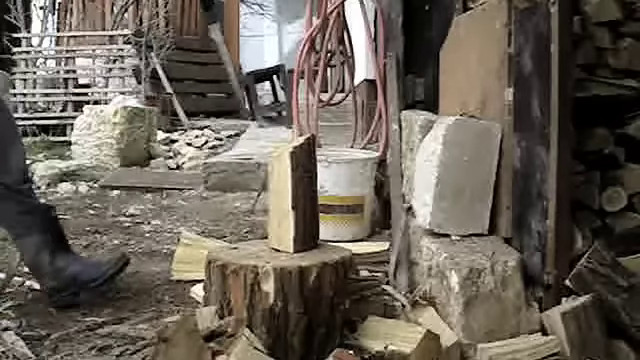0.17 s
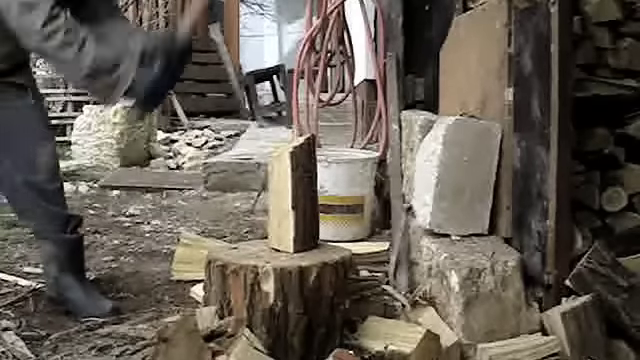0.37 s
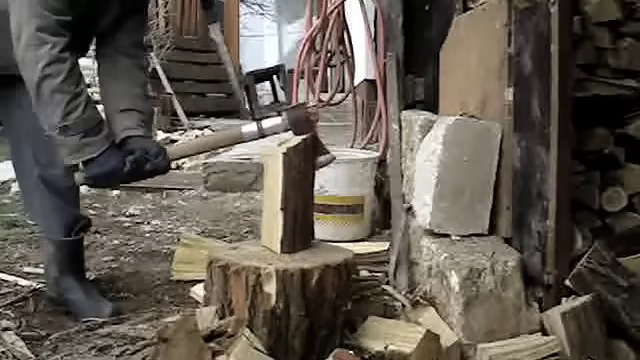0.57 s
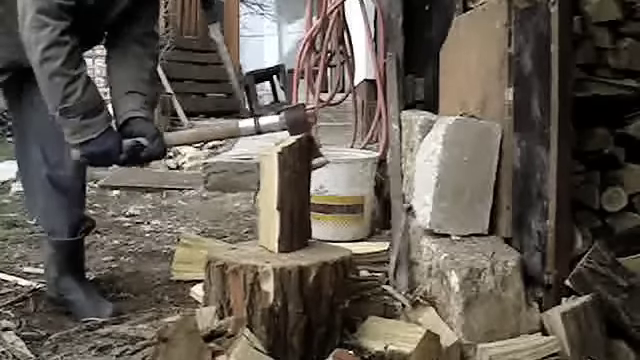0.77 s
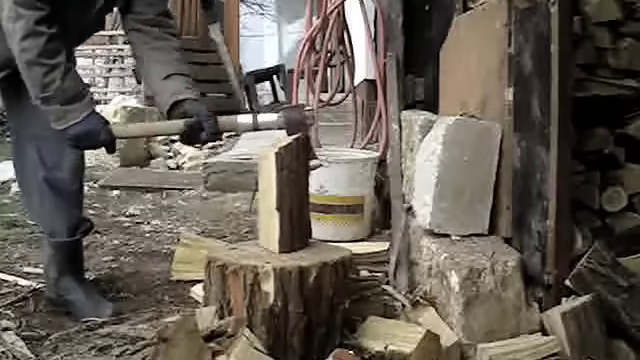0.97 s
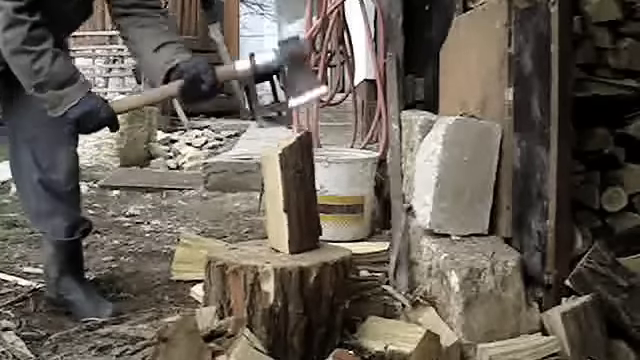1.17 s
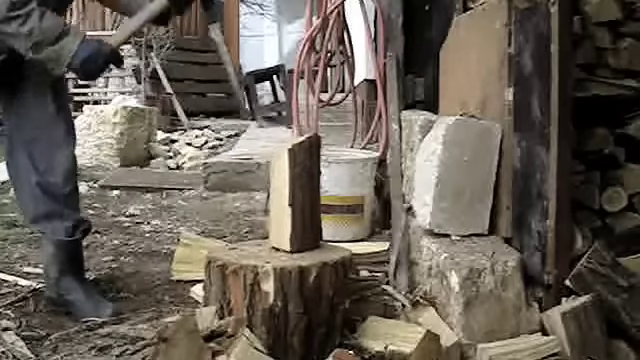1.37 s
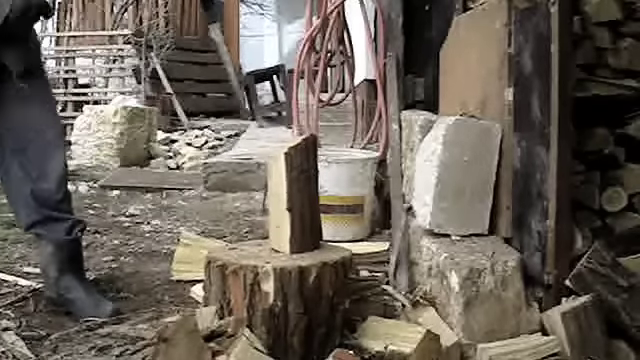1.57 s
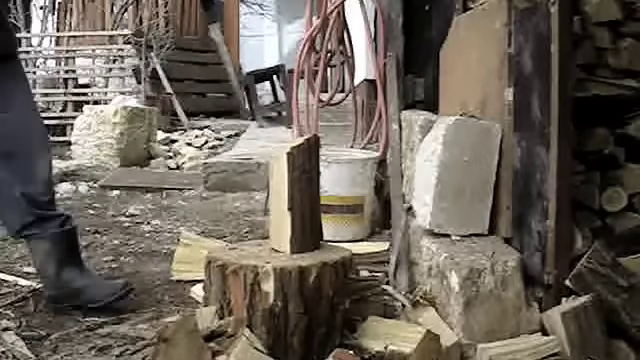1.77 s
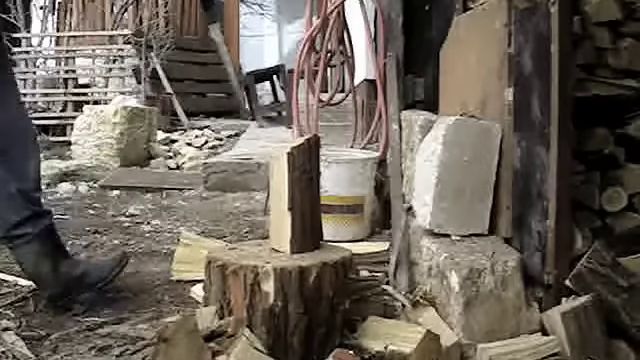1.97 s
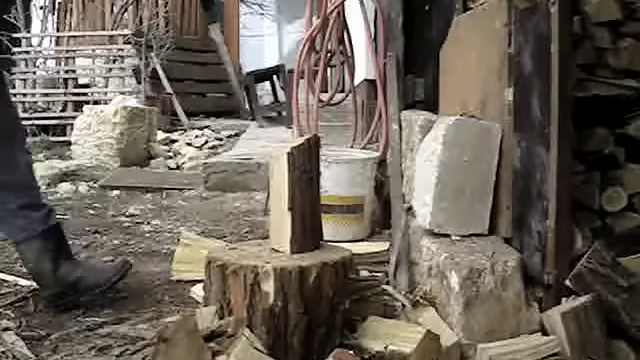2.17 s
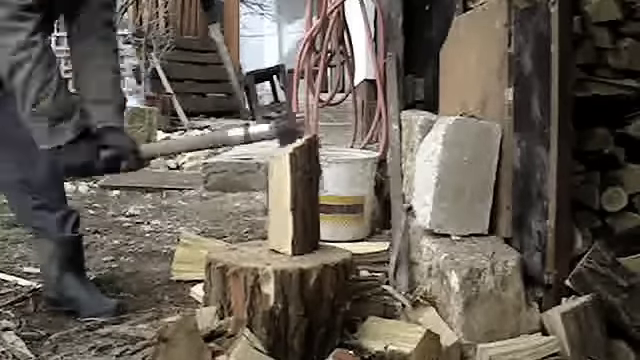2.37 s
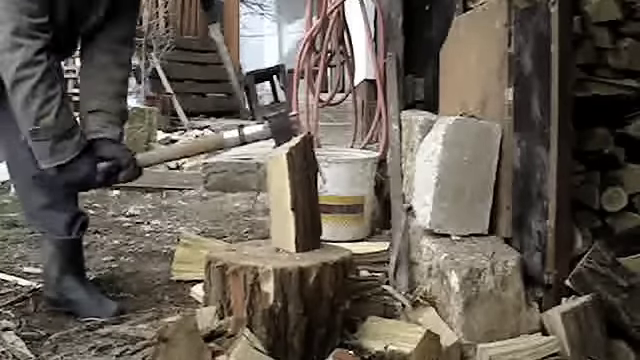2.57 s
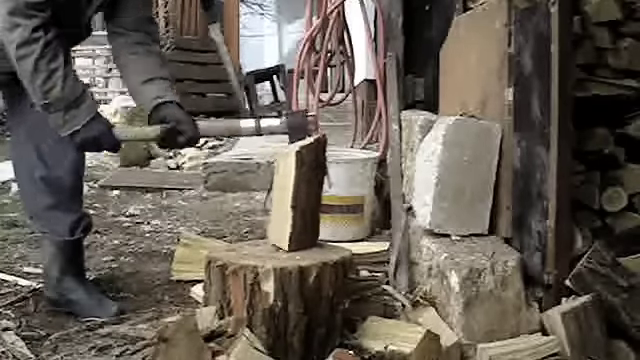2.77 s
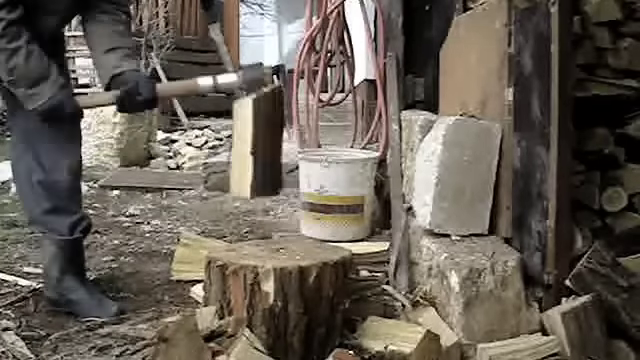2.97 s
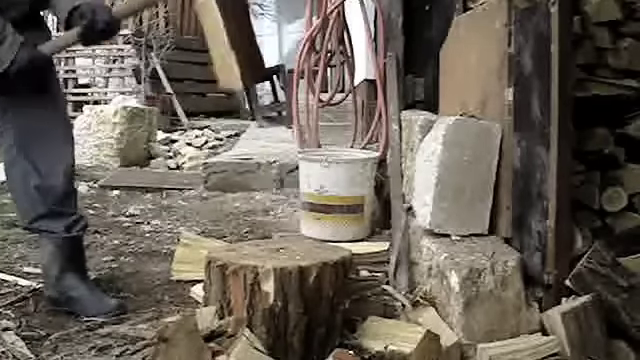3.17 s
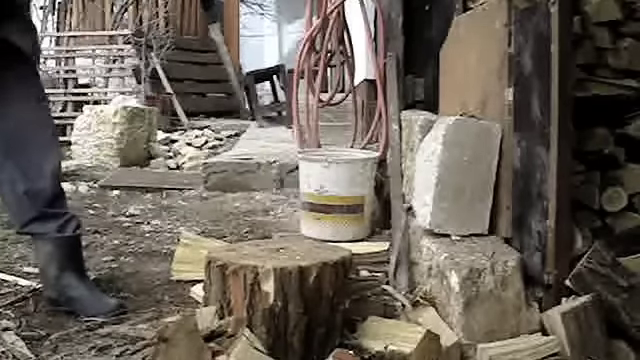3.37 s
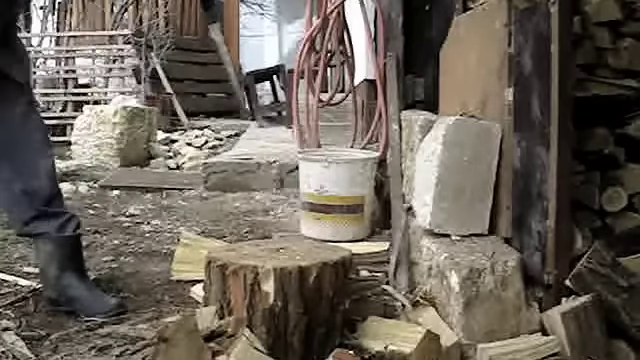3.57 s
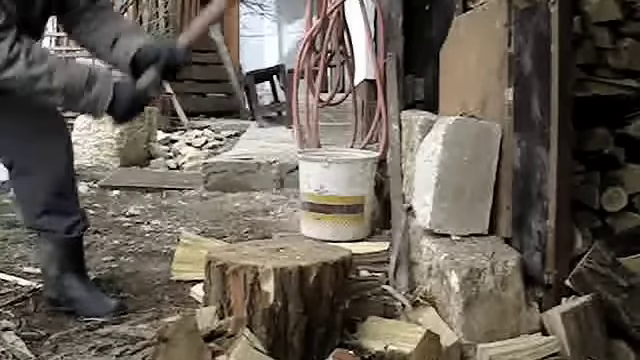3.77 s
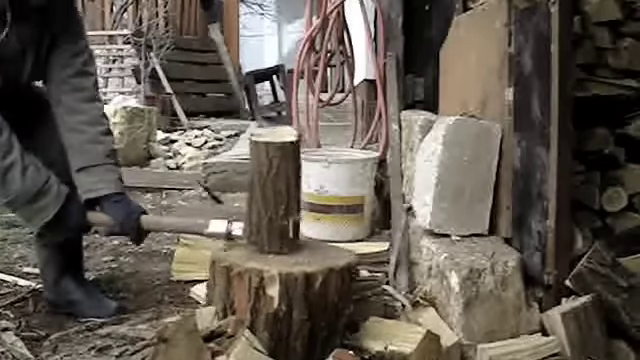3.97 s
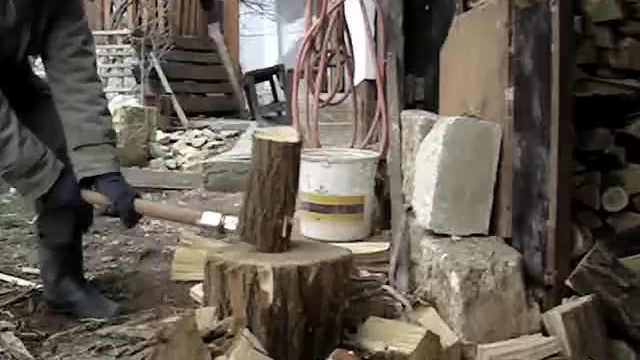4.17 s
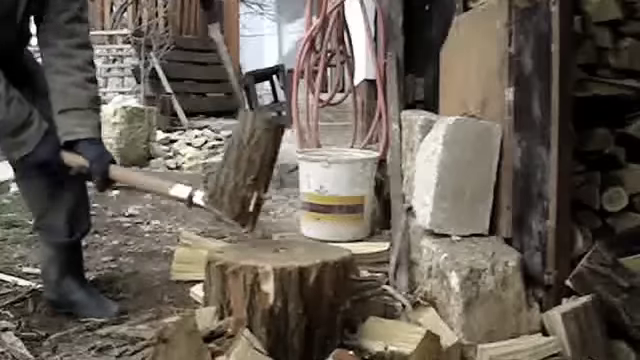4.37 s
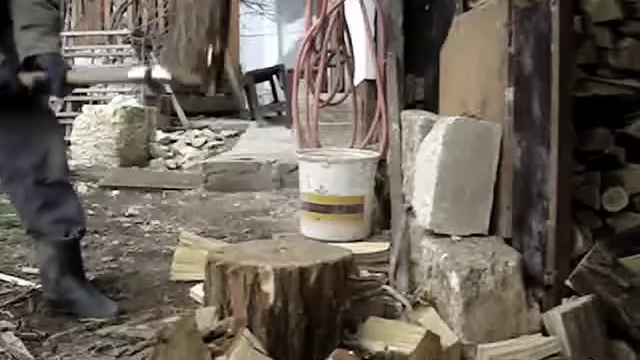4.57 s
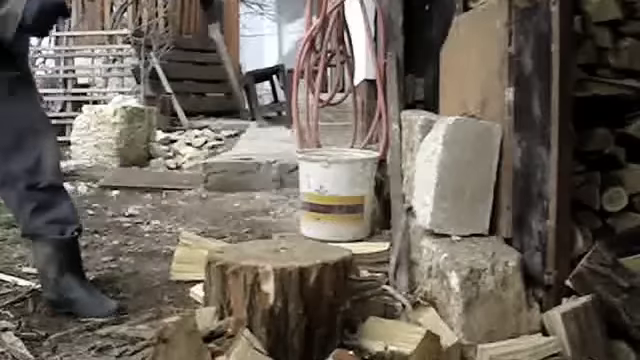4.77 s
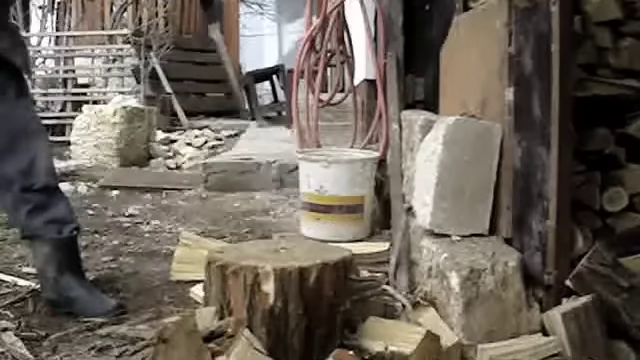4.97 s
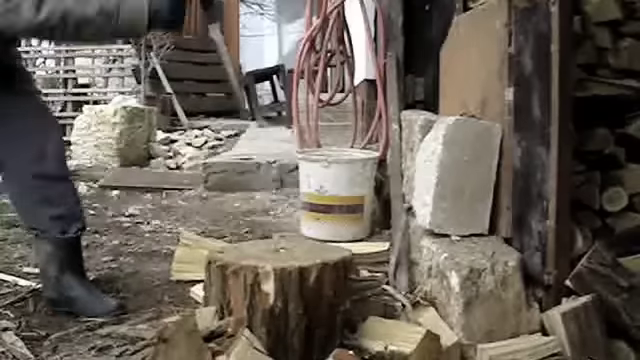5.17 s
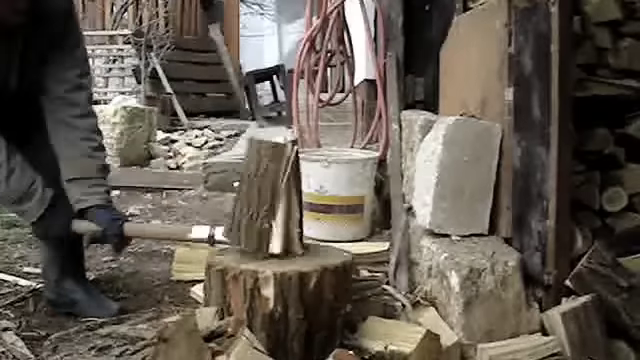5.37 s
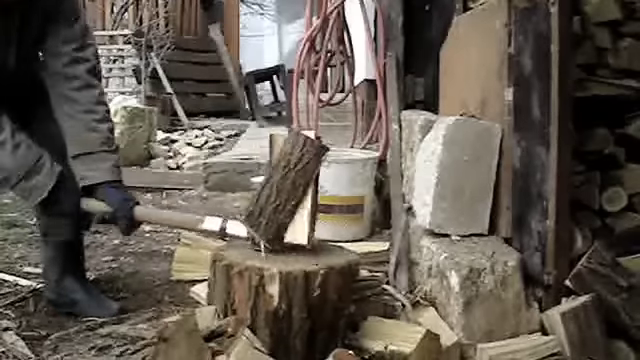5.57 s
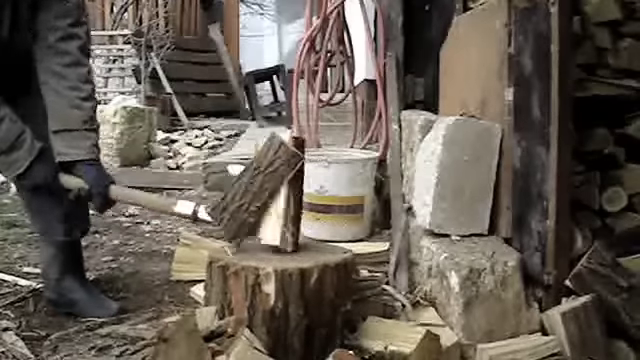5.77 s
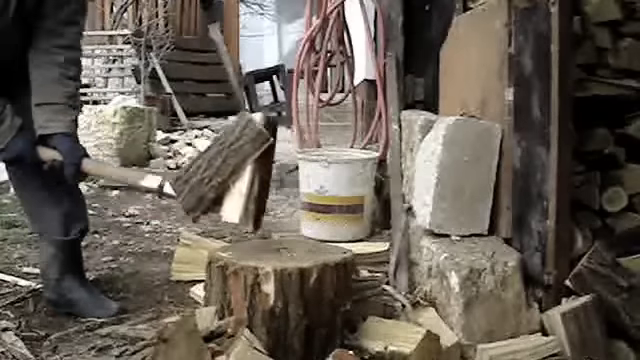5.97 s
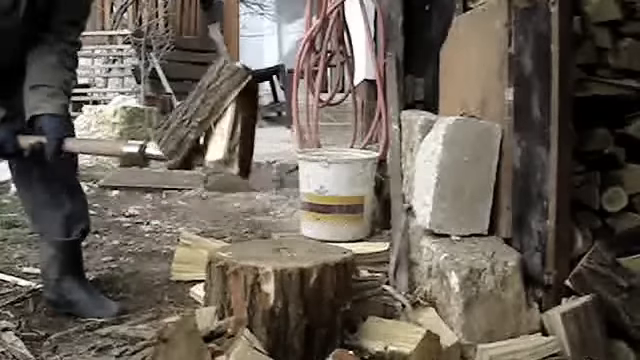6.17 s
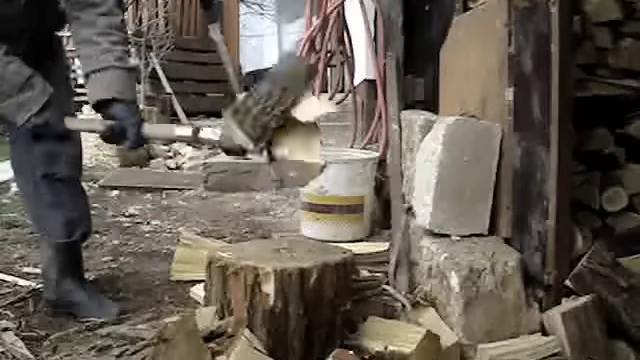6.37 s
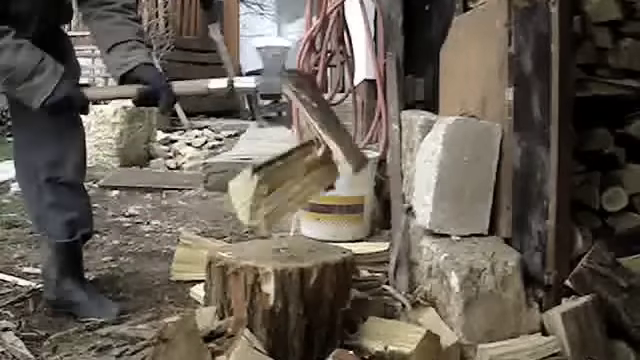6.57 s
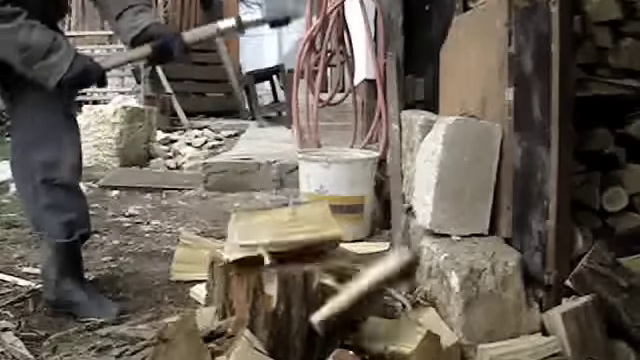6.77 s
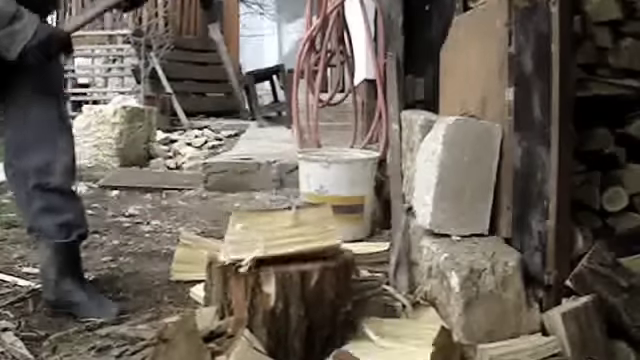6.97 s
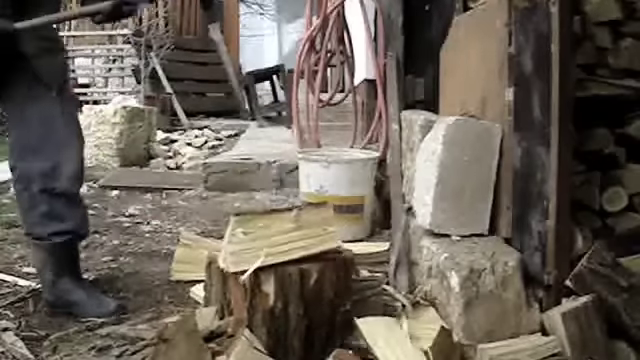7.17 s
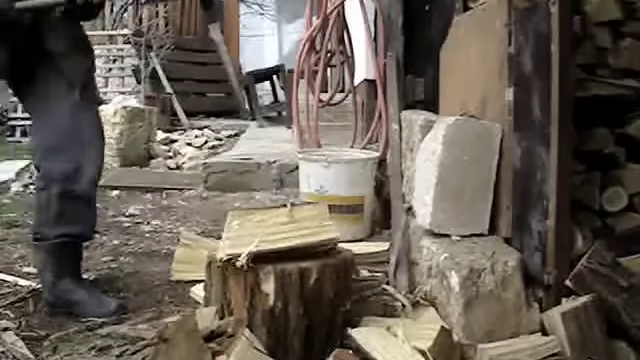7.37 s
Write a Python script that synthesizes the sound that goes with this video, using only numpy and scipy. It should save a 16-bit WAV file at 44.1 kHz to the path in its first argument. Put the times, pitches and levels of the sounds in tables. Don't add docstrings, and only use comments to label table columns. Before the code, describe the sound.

Four sharp axe blows crunch into firewood on a block, fibres rip and burst, and split pieces clatter down over faint town noise.

```python
import sys
import numpy as np
from scipy import signal
from scipy.fft import rfft, irfft
from scipy.io import wavfile
from scipy.ndimage import uniform_filter1d, minimum_filter1d

SR = 44100
rng = np.random.default_rng(int(sys.argv[2]) if len(sys.argv) > 2 else 0)


def unload_audio(sound):
    columns = np.transpose(np.atleast_2d(sound))
    steps = np.round(np.clip(columns, -1, 1) * 32767)
    wavfile.write(sys.argv[1], SR, steps.astype(np.int16))


def undo_db(level):
    steps = np.asarray(level, float) / 20
    return 10 ** steps


N = 327663


def evened(x):
    return x / np.sqrt(np.mean(x ** 2) + 1e-20)


def read(points, hz):
    f, value = np.transpose(points)
    return np.interp(np.log(hz + 1), np.log(f + 1), value)


def add(mix, start_s, sound):
    part = mix[round(start_s * SR):][:len(sound)]
    part += sound[:len(part)]


def colour(x, spectrum):
    gain = undo_db(read(spectrum, np.fft.rfftfreq(len(x), 1 / SR)))
    return irfft(rfft(x) * gain, len(x))


def band(x, lo_hz, hi_hz):
    sos = signal.butter(2, [lo_hz, min(hi_hz, .45 * SR)], "band", fs=SR, output="sos")
    return signal.sosfilt(sos, x)


def resonate(x, hz, width_hz):
    turn = np.exp(2j * np.pi * hz * np.arange(len(x)) / SR)
    r = np.exp(-np.pi * width_hz / SR)
    return 2 * (turn * signal.lfilter([1 - r], [1, -r], x / turn)).real


def ring(hz, t60_s, t):
    contact = 1 - np.exp(-t * hz * 3.7)
    return -np.sin(2 * np.pi * hz * t) * undo_db(-60 * t / max(t60_s, .004)) * contact


def crackle(size, per_s, spread_db):
    big = undo_db(spread_db * np.minimum(rng.exponential(1, size), 4))
    return big * rng.choice([-1., 1.], size) * (rng.random(size) < per_s / SR)


def swell(climax_s, rise_s, fall_s):
    t = np.arange(-min(abs(rise_s), climax_s), abs(fall_s), 1 / SR)
    return climax_s + t[0], np.where(t < 0, t / rise_s, -t / fall_s)


def smoothed(x, width_hz):
    z, t = rfft(x), np.arange(len(x)) / SR
    mean = np.sqrt(uniform_filter1d(abs(z) ** 2, size=int(width_hz * len(x) / SR)))
    return irfft(z * mean / (abs(z) + .1 * mean), len(x)) * np.exp(-(t / .08) ** 4)


def yard(x):
    # frequency in Hz, t60 in s.
    decay = [(100, 0.13), (300, 0.36), (800, 0.33), (2000, 0.33), (5000, 0.3), (10000, 0.25)]
    taps = np.zeros(SR // 2)
    at = np.arange(60, len(taps) - 10, 10)
    taps[at + rng.integers(0, 10, len(at))] = rng.choice([-1., 1.], len(at))
    hz, t, z = signal.stft(taps, SR, nperseg=256)
    tail = signal.istft(z * undo_db(-60 * t / read(decay, hz)[:, None]), SR, nperseg=256)[1]
    return signal.fftconvolve(x, tail / np.linalg.norm(tail))


def axe_blows():
    # start in s, strength in dB, block thump in dB, crunch length in s.
    blows = [
        (0.533, -16, -26, 0.022),
        (2.476, -15, -27, 0.015),
        (3.987, -13, -22, 0.0065),
        (5.472, -16, -14.5, 0.01),
    ]
    # frequency in Hz, width in Hz, level in dB.
    log_modes = [
        [(818, 64, -2), (1150, 150, -14), (1790, 86, -34), (2900, 51, 8), (3460, 43, 10)],
        [(1030, 94, 3.5), (1870, 26, 4), (2050, 37, 2), (2750, 96, -19), (5130, 34, 4)],
        [(905, 38, 8), (1440, 59, -22), (2350, 14, -9), (2800, 110, 11.5), (3270, 24, -4)],
        [(930, 35, -31), (1700, 64, -12), (1830, 100, -17), (2760, 33, -6), (3790, 160, -3)],
    ]
    # frequency in Hz, density in dB per Hz.
    crunch_spectra = [
        [(35, -58), (60, -27), (158, -16.5), (812, -0.5), (1450, -8.5), (1840, 1.5), (2280, -8), (7950, -16),
         (10300, -21.5), (13400, -64), (22000, -120)],
        [(35, -62.5), (60, -30), (254, -17), (669, -4.5), (812, -4), (986, -5.5), (1960, -3.5), (5170, -15.5),
         (10300, -28), (13400, -64), (22000, -120)],
        [(35, -67), (60, -38), (336, -5), (627, -11), (812, -2.5), (2010, -8), (2830, -13.5), (7790, -21),
         (10300, -26), (13400, -68), (22000, -120)],
        [(35, -44), (60, -11), (151, -20.5), (944, -4.5), (1050, -13.5), (2010, -2), (2330, -9.5),
         (9450, -18.5), (10300, -29), (13400, -67), (22000, -120)],
    ]
    out = np.zeros(N)
    t = np.arange(SR // 4) / SR
    for (start_s, db, thump_db, length_s), modes, spectrum in zip(blows, log_modes, crunch_spectra):
        burst = smoothed(crackle(len(t), 6000, 3.0) * np.exp(-t / length_s), width_hz=3400)
        crunch = evened(colour(burst, spectrum))
        log_ring = sum(undo_db(d) * resonate(crunch, hz, width_hz + 150) for hz, width_hz, d in modes)
        crunch += 0.4 * evened(log_ring)
        crunch *= np.sqrt(length_s * 2) * np.exp(-(t / .12) ** 4)
        sound = undo_db(db) * (crunch + undo_db(thump_db) * ring(176, 0.011, t))
        add(out, start_s + 0.000964, undo_db(3.5) * sound)
        add(out, start_s + 0.000964, undo_db(10.0) * yard(sound))
    return out


def snaps():
    # start in s, peak in dB, push of air below 150 Hz in dB.
    rows = [(0.5347, -5, -39), (2.4766, -4, -36.5), (3.9875, -1, -38), (4.2797, -26, -80),
            (5.4712, -4, -39), (5.4853, -11, -60), (5.506, -15, -58), (0.5505, -3, -55), (2.4865, -11, -53),
            (6.9006, -14, -60), (6.502, -10.5, -49), (6.5124, -16, -52), (6.5191, -38, -63),
            (6.791, 4, -31), (6.8172, -10.5, -46), (6.8359, -13.5, -59), (6.8545, -22, -62)]
    out = np.zeros(N)
    t = np.arange(SR // 10) / SR
    crack = band(np.exp(-t / .0001), 350, 12600)
    push = t / 0.0019 * np.exp(1 - t / 0.0014)
    for start_s, db, push_db in rows:
        sound = -undo_db(db + 6.5) * crack / crack.max() - undo_db(push_db + 18.0) * push
        add(out, start_s + 0.001035, sound)
    return out


def tears():
    # climax in s, level in dB, build-up in s, dying in s, treble in dB.
    rows = [
        (5.45, -21, 0.08, 0.062, -9),
        (6.522, -25, .21, 0.069, -9.5),
        (6.79, -14.5, .006, 0.062, -31),
        (6.858, -31.5, 0.11, 0.19, -6.5),
    ]
    # two splinter pitches of a tear in Hz, the first rung half as loud as the second.
    splinters = [(1750, 720), (2440, 1580), (1220, 790), (1400, 2900)]
    # frequency in Hz, density in dB per Hz.
    fibre = [
        [(88, -49), (150, -15), (477, -6), (611, -11), (713, -1), (1240, -4), (1690, 0), (6000, -13.5),
         (7800, -46), (13200, -120)],
        [(88, -48), (150, -25), (724, -6), (1000, -10), (1720, -4), (1890, -10), (2650, -3), (6000, -17.5),
         (7800, -44), (13200, -120)],
        [(88, -43), (150, -11), (548, -11), (1170, -2), (4270, -7), (4990, -18), (5470, -49), (6000, -20),
         (7800, -48), (13200, -120)],
        [(88, -56), (150, -26), (315, -28), (986, -12), (1120, -8), (1380, 1), (1690, 3), (6000, -12),
         (7800, -46), (13200, -120)],
    ]
    depth_db, treble_share = 23, 0.55
    out = np.zeros(N)
    for (climax_s, db, rise_s, fall_s, treble_db), (low_hz, high_hz), spectrum in zip(rows, splinters, fibre):
        start_s, ramp = swell(climax_s, rise_s, fall_s)
        clicks = crackle(len(ramp), 4000, 2.1)
        clumps = undo_db(2 * evened(uniform_filter1d(rng.standard_normal(len(ramp)), size=350)))
        body = evened(colour(clicks, spectrum))
        body = evened(body + 0.5 * resonate(body, low_hz, 300) + resonate(body, high_hz, 300))
        fizz = evened(band(clicks, 3160, 9700)) * undo_db(treble_db - (1 - treble_share) * depth_db * ramp)
        soft_ends = np.clip(6.8 * (1 + ramp), 0, 1)
        add(out, start_s, undo_db(db - 5.5 + depth_db * ramp) * (body + fizz) * soft_ends * clumps)
    return out


def knocks():
    # start in s, peak in dB, low ring in Hz, high ring in Hz, high ring in dB.
    rows = [
        (1.246, -18, 303, 845, -6.5),
        (1.577, -32.5, 278, 630, -7.5),
        (6.901, -2.5, 225, 980, -2),
        (6.935, -9.5, 517, 690, -1),
        (6.964, -25, 404, 880, -16),
        (7.02, -26, 264, 656, -2.5),
        (7.039, -53, 440, 730, -9),
        (7.069, -29, 468, 880, 7),
        (7.09, -16, 175, 803, -3),
        (7.098, -24, 456, 934, 2.5),
    ]
    t60_s = 0.026
    out = np.zeros(N)
    t = np.arange(SR // 5) / SR
    for start_s, db, low_hz, high_hz, high_db in rows:
        puff = evened(band(rng.standard_normal(len(t)), 150, 1030)) * np.exp(-t / 0.013)
        cluster = sum(ring(high_hz * k, 0.63 * t60_s, t) / k for k in (.68, 1, 1.42))
        sound = ring(low_hz, t60_s, t) + undo_db(high_db) * (0.97 * cluster + 0.27 * puff)
        sound = band(band(sound, 92, 7000), 0.41 * low_hz, 9000)
        add(out, start_s + 0.000893, undo_db(db) * rng.choice([-1, 1]) * sound)
    return out


def ticks(rows, wide_db, t60_s, snap_s):
    out = np.zeros(N)
    t = np.arange(SR // 6) / SR
    for start_s, db, hz, snap_db in rows:
        noise = rng.standard_normal((2, len(t)))
        rough = evened(band(noise[0], hz / 1.6, hz * 2.2)) * undo_db(wide_db - 60 * t / t60_s)
        rough *= np.minimum(t / .001, 1)
        bright = evened(band(noise[1], 2300, 7900)) * np.exp(-t / snap_s) * np.minimum(t / 0.0005, 1)
        sound = undo_db(db) * (ring(hz, t60_s, t) + rough) + undo_db(snap_db) * bright
        add(out, start_s + 0.000975, sound)
    return out


def splinter_breaks():
    # start in s, peak in dB, ring in Hz, snap at 2.3 to 7.9 kHz in dB.
    rows = [(5.391, -37, 1480, -43), (5.41, -27, 2550, -33), (5.436, -26.5, 4260, -38),
            (6.3292, -32, 2480, -38), (6.347, -34, 3560, -38), (5.452, -18, 910, -32),
            (5.449, -26, 2550, -36), (6.405, -23.5, 2570, -43), (6.458, -22.5, 2700, -46),
            (6.468, -19, 712, -38), (6.485, -25, 2120, -35), (6.511, -20.5, 1700, -18),
            (6.519, -17.5, 2800, -34), (6.64, -47, 4570, -34.5), (6.79, -10.5, 1220, -11),
            (6.802, -19, 1150, -39), (6.836, -23, 2410, -20), (6.854, -27, 1440, -22),
            (6.868, -22.5, 1380, -27.5), (6.882, -32, 2500, -30), (6.808, -27, 3500, -30),
            (6.846, -30, 3000, -33), (6.755, -46, 3000, -39)]
    return ticks(rows, wide_db=-1.9, t60_s=0.034, snap_s=0.0024)


def pings():
    # start in s, peak in dB, ring in Hz, snap at 2.3 to 7.9 kHz in dB.
    rows = [(0.24, -38, 760, -28), (0.868, -32.5, 1840, -61), (0.869, -47, 4120, -70),
            (1.164, -38, 1940, -62), (1.208, -35, 1760, -59), (1.217, -28, 1790, -59),
            (1.247, -17, 1680, -62), (1.314, -36, 780, -59), (1.425, -39.5, 1730, -55),
            (3.402, -51, 1330, -37), (5.436, -19, 885, -36), (5.907, -22.5, 1750, -60),
            (5.908, -30.5, 3350, -70), (5.869, -42, 3660, -63), (6.378, -30, 4220, -42),
            (6.5, -16, 2686, -37), (6.615, -31.5, 2360, -51), (6.902, -9, 914, -27),
            (7.272, -26.5, 2500, -47), (7.404, -34, 1550, -60), (7.421, -34, 1650, -49)]
    return ticks(rows, wide_db=-14, t60_s=0.028, snap_s=0.0032)


def steel_rings():
    # start in s, peak in dB, mode in Hz, t60 in s.
    rows = [(4.2805, -32, 1040, .06), (4.2805, -28, 1800, .04), (4.2805, -33, 2400, .03),
            (4.2805, -30, 3800, 0.033), (4.2805, -26, 3180, 0.02), (4.2925, -32, 1800, .05),
            (4.2925, -39, 3800, 0.025), (5.908, -42, 2750, .08), (5.908, -41, 3380, .06),
            (5.42, -25.5, 1674, .07), (5.397, -32, 1400, 0.043), (5.5045, -17, 1600, .06),
            (5.52, -14.5, 2750, 0.044), (5.512, -16, 1900, .06), (5.54, -19, 2100, .05),
            (6.411, -23, 2480, 0.035), (6.519, -14, 2750, .03), (.869, -45, 4150, .05)]
    out = np.zeros(N)
    t = np.arange(SR // 4) / SR
    for start_s, db, hz, t60_s in rows:
        add(out, start_s, undo_db(db) * ring(hz, t60_s, t))
    return out


def log_hums():
    # start in s, peak in dB, mode in Hz, t60 in s.
    rows = [
        (6.319, -41.5, 2500, .2),
        (6.329, -39, 2400, .12),
        (6.13, -40, 970, 0.14),
        (6.13, -45.5, 1330, .05),
        (1.249, -30.5, 845, 0.16),
        (1.249, -61, 2660, 0.1),
        (1.4, -48, 3340, 0.041),
        (4.29, -43, 980, 0.24),
        (5.476, -6, 1010, 0.064),
        (5.5, -30, 1880, 0.21),
    ]
    out = np.zeros(N)
    t = np.arange(SR // 4) / SR
    for start_s, db, hz, t60_s in rows:
        fuzz = evened(resonate(rng.standard_normal(len(t)), hz, 170))
        add(out, start_s, undo_db(db - 60 * t / t60_s) * fuzz * np.minimum(t / 0.00048, 1))
    return out


def crumbs():
    # start in s, peak in dB, ring in Hz, snap at 2.3 to 7.9 kHz in dB.
    rows = [(0.358, -37, 3030, -51), (1.716, -35.5, 1635, -31.5), (1.855, -40, 760, -42),
            (3.157, -47.5, 1370, -49), (3.887, -44.5, 2240, -45), (4.279, -29, 2290, -38),
            (4.292, -36, 2520, -46), (1.247, -30, 1100, -48), (4.397, -46.5, 2900, -56),
            (4.513, -48.5, 3220, -58), (5.34, -47, 1790, -51), (5.624, -33, 1700, -35.5),
            (5.701, -30, 800, -53), (5.705, -36, 2440, -52), (5.727, -29.5, 1170, -58),
            (5.801, -41.5, 3050, -34.5), (5.891, -43, 1126, -62), (6.92, -40, 670, -26),
            (7.118, -44, 1005, -35.5)]
    return ticks(rows, wide_db=0, t60_s=0.046, snap_s=0.0032)


def scuffs():
    # climax in s, level in dB, build-up in s, dying in s.
    rows = [(0.001, -51, 0.00089, .12), (0.15, -34, 0.095, 0.06), (0.4, -48, 0.16, 0.22),
            (0.89, -49.5, 0.041, 0.22), (1.0, -44.5, 0.23, 0.071), (1.238, -44.5, 0.12, 0.043),
            (1.522, -49.5, 0.17, 0.26), (1.724, -42, .17, 0.048), (1.86, -54, 0.028, 0.07),
            (2.11, -38.5, 0.14, 0.052), (2.85, -46, 0.13, 0.13), (3.57, -45.5, 0.28, 0.23),
            (5.57, -39.5, 0.14, 0.21), (6.95, -47.5, 0.11, 0.67), (7.27, -37.5, 0.0072, 0.053),
            (7.425, -47, 0.18, .004)]
    # frequency in Hz, density in dB per Hz.
    rub_spectrum = [(180, -34), (300, -11), (1310, -5), (2100, -3), (2660, -5.5), (4970, -8.5), (9560, -12),
                    (10400, -30), (13600, -63), (22000, -120)]
    out = np.zeros(N)
    for climax_s, db, rise_s, fall_s in rows:
        start_s, ramp = swell(climax_s, rise_s, fall_s)
        rub = evened(colour(crackle(len(ramp), 9000, 3.5), rub_spectrum))
        add(out, start_s, undo_db(db + 18.5 * ramp) * rub * signal.windows.tukey(len(ramp), .1))
    return out


def slow_gain(t):
    # time in s, drop in dB.
    ducks = [
        (0.535, 17),
        (1.25, 1.5),
        (2.477, 16),
        (3.987, 10),
        (5.472, 11),
        (6.5, -3.5),
        (6.9, 0.5),
    ]
    recover_s, grab_db, grab_s = 0.89, 12, 0.027
    gain_db = np.zeros(np.shape(t))
    for start_s, drop_db in ducks:
        since_s = np.maximum(t - start_s, 0)
        dip = np.exp(-since_s / recover_s) + grab_db / 10 * np.exp(-since_s / grab_s)
        gain_db -= (t > start_s) * drop_db * dip
    return gain_db


def town():
    # frequency in Hz, density in dB per Hz.
    wash_spectrum = [(12, -46), (20, 3), (63, -7), (330, -5.5), (571, -4), (704, -5), (846, -4.5),
                     (1630, -8.5), (1860, -9.5), (8260, -14), (10400, -17), (13600, -61), (22000, -120)]
    # time in s, level in dB.
    traffic = [(0, -39.5), (1.5, -41), (3.5, -41.5), (5.2, -43.5), (7.43, -51.5)]
    # swell centre in s, level in dB, half width in s.
    engine_swells = [
        (0.3, -59.5, 1),
        (2.3, -55, 0.55),
        (3.2, -61, 0.35),
        (5.1, -62, 0.97),
        (6.0, -60, 0.47),
        (6.951, -52, .1),
    ]
    hiss_db, hiss_share, drone_share = -50, 0.37, 1.3
    traffic_patch_db, hiss_patch_db = 1.5, .9

    frames, hz = N // 256 + 5, np.fft.rfftfreq(1024, 1 / SR)
    a, b, patches = rng.standard_normal((frames, 513, 3)).T
    patches = evened(uniform_filter1d(uniform_filter1d(patches, 10, 0), 10, 1))
    t = np.arange(frames) * 256 / SR
    gain_db = slow_gain(t)

    high = np.clip(np.log(hz / 1500 + 1e-9) / np.log(3.0), 0, 1)[:, None]
    traffic_lift_db = np.interp(t, *np.transpose(traffic)) + gain_db + 51
    hiss_lift_db = hiss_db + hiss_share * gain_db + 52.5
    lift_db = (1 - high) * traffic_lift_db + high * hiss_lift_db
    patch_db = traffic_patch_db + (hiss_patch_db - traffic_patch_db) * high
    z = (a + 1j * b) * undo_db(read(wash_spectrum, hz)[:, None] + patch_db * patches)
    scale = undo_db(-53.0) / np.std(signal.istft(z, nperseg=1024, noverlap=768)[1])
    wash = scale * signal.istft(z * undo_db(lift_db), nperseg=1024, noverlap=768)[1][:N]

    noise = rng.standard_normal((2, N))
    drone = evened(resonate(resonate(noise[0], 51, 30), 51, 30))
    engine = sum(undo_db(db) * np.exp(-((t - s) / width_s) ** 2) for s, db, width_s in engine_swells)
    drone *= np.interp(np.arange(N) / SR, t, engine * undo_db(drone_share * gain_db))
    whine = undo_db(-67.5) * evened(resonate(noise[1], 8050, 120))
    return wash + drone + whine


def scene():
    wood = splinter_breaks() + pings() + crumbs() + knocks() + log_hums() + steel_rings() + tears()
    close = axe_blows() + scuffs() + snaps()
    return (close + wood + undo_db(-9.5) * yard(wood)[:N] + town())[None]


def thin_treble(x):
    hz, t, z = signal.stft(x, SR, nperseg=256, noverlap=192)
    level_db = 10 * np.log10(np.mean(abs(z[6:]) ** 2, 0) + 1e-14)
    coming_db = -minimum_filter1d(-level_db, size=11, origin=-5) - level_db
    lowest_hz = 9000 * undo_db(-.62 * np.maximum(coming_db - 10.5, 0))
    gone = (hz[:, None] > lowest_hz) & (coming_db > 11)

    busy = uniform_filter1d(abs(np.gradient(uniform_filter1d(level_db, 8))), 40)
    chance = np.kron(rng.random((len(t) // 8 + 1, 33)).T, np.ones((4, 8)))[:len(hz), :len(t)]
    treble_db = 10 * np.log10(np.mean(abs(z[27:55]) ** 2, 0) + 1e-14)
    near_db = -minimum_filter1d(-treble_db, size=25)
    between = (near_db - treble_db > 5) & (near_db > treble_db.max() - 22)
    holes = (hz[:, None] > 4700) & (chance < .04 + .12 * busy + .4 * between)

    z *= 1 + undo_db(-12) * np.exp(2j * np.pi * rng.random(z.shape))
    kept = np.where(gone, undo_db(-12.0), np.where(holes, undo_db(-18), 1))
    return signal.istft(z * kept, SR, nperseg=256, noverlap=192)[1][:N]


def spits():
    # time in s, peak in dB.
    rows = [
        (0.5505, -53),
        (2.4772, -53),
        (3.9883, -49),
        (5.4722, -70),
        (6.792, -60),
        (6.902, -72),
    ]
    t, out = np.arange(-200, 200) / SR, np.zeros(N)
    for peak_s, db in rows:
        burst = evened(band(rng.standard_normal(len(t)), 11500, 15000))
        add(out, peak_s + t[0], undo_db(db) * burst * np.exp(-(t / .0011) ** 2))
    return out


def low_pass(x):
    return signal.sosfilt(signal.butter(12, 15500, fs=SR, output="sos"), x)


def record(dry):
    power = signal.lfilter([.004], [1, -.996], dry[0] ** 2)
    power_db = 10 * np.log10(power + 1e-12)
    fall_db = np.arange(N) * 250 / SR
    over_db = np.maximum(np.maximum.accumulate(power_db + fall_db) - fall_db + 13.0, 0)
    held = dry[0] / undo_db(.75 * over_db)
    ceiling = np.where(held > 0, .75, 1.1)
    held = band(ceiling * np.tanh(held / ceiling), 4.7, 11200)
    edge = signal.firwin(255, 10250, window=("kaiser", 9), fs=SR)
    limited = signal.oaconvolve(np.clip(thin_treble(held), -.9, .9), edge, "same") + spits()
    return low_pass(limited[None])


dry = scene()
out = record(dry)
unload_audio(out)
```